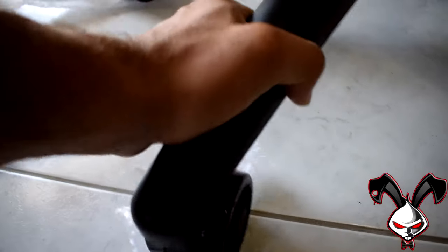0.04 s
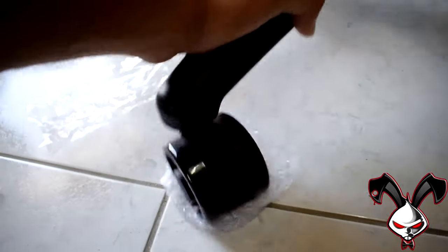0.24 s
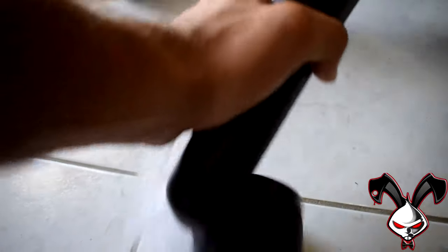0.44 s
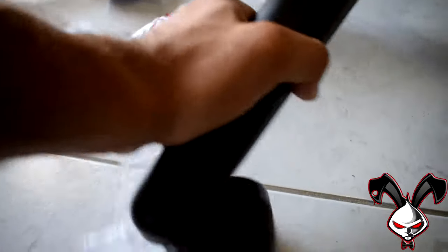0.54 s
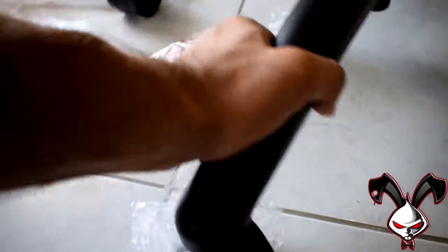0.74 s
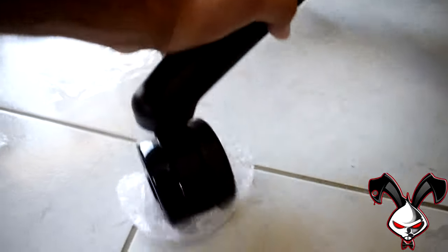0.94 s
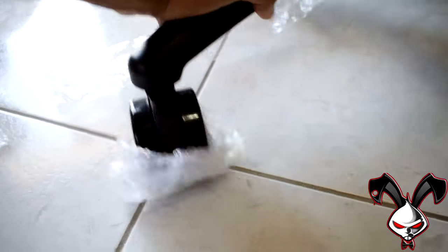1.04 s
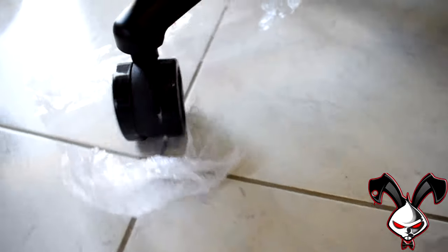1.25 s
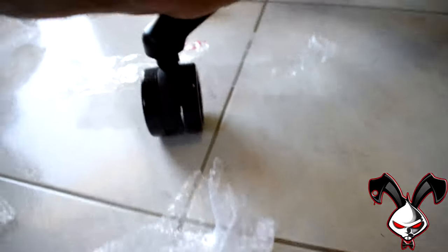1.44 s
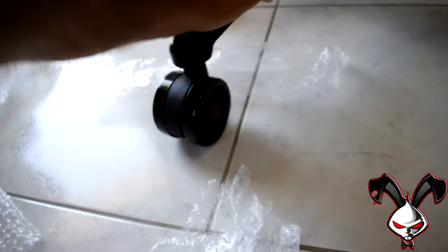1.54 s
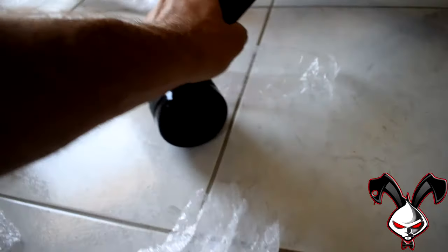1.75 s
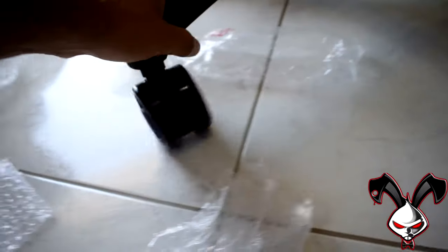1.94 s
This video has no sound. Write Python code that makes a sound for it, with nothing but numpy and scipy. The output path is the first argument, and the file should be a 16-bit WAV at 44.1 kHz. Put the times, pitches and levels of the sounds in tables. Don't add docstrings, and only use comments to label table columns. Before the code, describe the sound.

Bubble wrap popping under a hard plastic caster wheel, sharp crackling bursts with rattles on tile

```python
import sys
import numpy as np
from scipy import signal
from scipy.fft import rfft, irfft
from scipy.io import wavfile

SR = 44100
rng = np.random.default_rng(int(sys.argv[2]) if len(sys.argv) > 2 else 0)


def convert_level_to_amplitude(level_db):
    exponent = np.asarray(level_db, float) / 20
    return 10 ** exponent


def waveform_to_disk(signal):
    frames = np.transpose(np.atleast_2d(signal))
    scaled = np.clip(frames, -1, 1) * 32767
    samples = np.round(scaled).astype(np.int16)
    wavfile.write(sys.argv[1], SR, samples)


N = 88200
TRAVEL_S = 0.0012


def time(seconds):
    return np.arange(int(seconds * SR)) / SR


def fade(t, t60_s):
    return np.exp(-np.log(1000) * t / max(t60_s, 0.001))


def unit(x):
    return x / np.sqrt(np.mean(x ** 2))


def colour(x, points):
    point_hz, point_db = np.array(points, float).T
    hz = np.arange(x.shape[-1] // 2 + 1) * SR / x.shape[-1]
    gain = convert_level_to_amplitude(np.interp(np.log(hz + 1), np.log(point_hz), point_db))
    return irfft(rfft(x) * gain, x.shape[-1])


def conv(x, response):
    return signal.fftconvolve(x, response)[:N]


def lowpass(x, hz):
    return signal.lfilter(*signal.butter(2, hz, fs=SR), x)


def highpass(x, hz):
    return signal.lfilter(*signal.butter(2, hz, "high", fs=SR), x)


def steep(x, order, hz, kind):
    return signal.sosfilt(signal.butter(order, hz, kind, fs=SR, output="sos"), x)


def add(out, start_s, grain):
    i = int(start_s * SR)
    out[i:i + len(grain)] += grain[:len(out) - i]


def burst(noise, hz, t60_s, width):
    top_ratio = 1.433
    t = time(0.04)
    kick = noise * fade(t, t60_s) * 0.69 + 3.18 * (t == 0)
    y = signal.lfilter(*signal.iirpeak(hz, 1 / width, fs=SR), kick)
    y = signal.lfilter(*signal.butter(3, hz * top_ratio, fs=SR), y)
    return y / np.abs(y).max()


# start_s [s], level_db [peak dB], pitch_hz [Hz], snap_db [dB against the ring]
BUBBLE_POPS = [(.208, 2, 2400, -35), (0.246, -4.5, 2640, -24), (.256, 9, 3040, -11.5),
               (0.264, -7, 2600, -23), (0.287, 2, 3300, -15.5), (.293, 1, 1350, -29), (.432, 4, 2320, -12),
               (.439, -24, 2220, -30), (.453, -1, 2600, -26), (0.464, 3.5, 1920, -21),
               (0.484, -8, 2760, -36), (0.49, -1.5, 2320, -42), (0.547, 3.5, 2100, -21),
               (0.55, 4, 3600, -14), (0.556, 1, 2000, -29), (0.636, -1.5, 1560, -36),
               (0.648, -10, 1580, -31.5), (.670, -3.5, 2220, -24), (0.679, -1, 3420, -28),
               (.7625, 0, 2960, -29), (0.7897, 4.5, 2300, -33), (0.799, 2.5, 2570, -15.5),
               (0.843, 0.5, 3650, -26), (0.951, -12, 3320, -1.5), (0.96, -3, 1220, -40),
               (.973, 2.5, 2400, -36), (1.070, 3.5, 2700, -19), (1.109, -10, 3820, -1),
               (1.127, -4, 1737, -23.5), (1.424, -14, 2320, -35)]


def pops():
    ring_t60_s, ring_width, ring_db = 0.021, 1.23, -2.5
    snap_t60_s, snap_hz, snap_gain_db = 0.0053, 5400, 7.5
    out, t = np.zeros(N), time(0.04)
    for start_s, level_db, pitch_hz, snap_db in BUBBLE_POPS:
        air, tear = rng.standard_normal((2, len(t)))
        ring = burst(air, pitch_hz, ring_t60_s, ring_width)
        snap = highpass(tear * fade(t, snap_t60_s), snap_hz)
        pop = ring + convert_level_to_amplitude(snap_db + snap_gain_db) * snap
        add(out, start_s + TRAVEL_S, convert_level_to_amplitude(level_db + ring_db) * pop)
    return out


def swell(t):
    contact_s, t60_s = 0.00038, 0.051
    return fade(t, t60_s) * (1 - np.exp(-t / contact_s))


# pitch_hz [Hz], level_db [dB]
SHELL_MODES = [(1125, -23), (1211, -30.5), (1416, -28.5), (1836, -53.5), (2089, -28.5), (2412, -21),
               (2659, -52.5), (2815, -22.5), (2945, -24.5), (3273, -23.5), (3763, -21), (4355, -34.5),
               (5173, -45), (5803, -36)]
MODE_HZ, MODE_DB = np.array(SHELL_MODES, float).T


def shell(gains_db, t):
    level = convert_level_to_amplitude(MODE_DB - MODE_DB.max() + gains_db)
    modes = level[:, None] * np.sin(2 * np.pi * MODE_HZ[:, None] * t)
    return modes.sum(0) * swell(t)


# start_s [s], level_db [peak dB], pitch_hz [Hz], ring_share [0-1]
WHEEL_KNOCKS = [(.301, -6, 2880, 0.2), (.314, -14.5, 1420, 0), (.349, -6, 3670, 0.4),
                (.410, -13, 3730, 0.3), (.700, -12.5, 1450, 0.3), (.734, -13.5, 3620, 0.4),
                (0.804, 3.5, 2830, 0.38), (0.811, -0.5, 1240, 0.2), (0.816, -10.5, 4400, 0.6),
                (.830, -5, 1300, 1), (0.838, -2, 3250, 0.3), (.847, -2.5, 3720, 0.86),
                (1.037, -6.5, 2470, 0.43), (1.077, 0, 2730, 0.64), (1.086, -4.5, 3750, 0.88),
                (1.099, -5.5, 3840, 0.77), (1.383, -22, 1570, 0.67), (1.4212, -9.5, 2450, 0.06),
                (1.437, -27, 2100, 0), (1.523, -25, 2660, 0.6), (1.546, -19, 2230, 0.14),
                (1.573, -22.5, 2870, 0.37), (1.587, -23, 1470, 0.67), (1.715, -31.5, 2380, .9),
                (1.766, -33, 2970, 0.3), (1.773, -22.5, 1470, 1), (1.786, -16, 2600, 0.45),
                (1.797, -13, 2780, 0.49), (1.827, -37, 2380, 0.1), (1.914, -24, 1570, 0.8)]


def knocks():
    spread_oct, scatter_db, ring_db = 0.35, 1, -4
    clack_t60_s, clack_width, clack_db = 0.022, 0.22, -4
    out, t = np.zeros(N), time(0.25)
    for start_s, level_db, pitch_hz, ring_share in WHEEL_KNOCKS:
        nearness_db = -6 * (np.log2(MODE_HZ / pitch_hz) / spread_oct) ** 2
        ring = shell(nearness_db + scatter_db * rng.standard_normal(len(MODE_HZ)), t)
        ring = ring / np.abs(ring).max()
        clack = burst(rng.standard_normal(len(time(0.04))), pitch_hz, clack_t60_s, clack_width)
        add(out, start_s + TRAVEL_S, convert_level_to_amplitude(level_db + ring_db) * ring_share * 2 * ring)
        add(out, start_s + TRAVEL_S, convert_level_to_amplitude(level_db + clack_db) * (1 - ring_share) * 2 * clack)
    return out


def clicks(rate_per_s, scatter_db):
    largest = 2.5
    hit, size, sign = rng.random((3, N))
    level = convert_level_to_amplitude(scatter_db * np.minimum(-np.log(size + 1e-9), largest))
    return (hit < rate_per_s / SR) * level * np.sign(sign - 0.5)


def grains(rate_per_s):
    scatter_db, smear_s = 1, 0.0055
    envelope = conv(np.abs(clicks(rate_per_s, scatter_db)), fade(time(0.02), smear_s))
    return envelope * rng.standard_normal(N)


# pitch_hz [Hz], level_db [dB per Hz]
FILM_COLOUR = [(60, -68), (120, -21), (320, -19), (620, -5), (1800, -0.5), (3800, -9.5), (6500, -22.5),
               (15500, -59)]


def film(rustle):
    crackle = unit(colour(grains(1200), FILM_COLOUR))
    fine = unit(steep(highpass(grains(4000), 5000), 8, 12130, "low"))
    return convert_level_to_amplitude(-3) * crackle + rustle * fine


def rattle(strength):
    taps_per_s, size_scatter_db, tap_scatter_db = 250, 8.5, 5
    t = time(0.3)
    taps = unit(clicks(taps_per_s, size_scatter_db)) * strength
    ring = np.zeros(N)
    for hz, db in SHELL_MODES:
        uneven = taps * convert_level_to_amplitude(tap_scatter_db * rng.standard_normal(N))
        ring += convert_level_to_amplitude(db) * conv(uneven, np.sin(2 * np.pi * hz * t) * swell(t))
    return ring / np.linalg.norm(shell(0, t)) / convert_level_to_amplitude(MODE_DB.max())


# start_s [s], crackle_db [dB], rattle_db and rustle_db [dB against crackle]
ROLLING_EFFORT = [(0, -25.5, -12.5, -10.5), (.16, -41, -4.5, -7), (.24, -29.5, -4.5, -7),
                  (.3, -14, -8, -16.5), (0.419, -28.5, -18.5, -15.5), (0.479, -13.5, -15, -21.5),
                  (.62, -22.5, -21, -17.5), (0.749, -20, -7.5, -21.5), (0.808, -10, -7, -21),
                  (0.929, -27, -9, -19), (1.03, -21, -2, -16), (1.088, -17.5, -13, -20),
                  (1.248, -38, -5, -10), (1.45, -27.5, -18, -18.5), (1.68, -50, -9, -20),
                  (1.79, -28.5, -15.5, -20), (1.88, -36, -13, -31), (2, -36, -19, -14)]


def rolling():
    start_s, *curves_db = np.array(ROLLING_EFFORT, float).T
    effort, wheel, rustle = (convert_level_to_amplitude(np.interp(time(N / SR), start_s, db)) for db in curves_db)
    return effort * film(rustle) + rattle(effort * wheel)


# start_s [s], level_db [peak dB]
AIR_PUFFS = [
    (0.212, -36),
    (0.26, -22),
    (0.435, -33),
    (0.465, -31),
    (0.55, -32),
    (0.847, -38),
]


def puffs():
    puff_s, left_db = 0.0013, -6
    out, t = np.zeros(N), time(0.04)
    for start_s, level_db in AIR_PUFFS:
        add(out, start_s, convert_level_to_amplitude(level_db) * np.e * t / puff_s * np.exp(-t / puff_s))
    return out * convert_level_to_amplitude(np.array([[left_db], [-left_db]]) / 2)


# delay_s [s], level_db [dB]
NEAR_ECHOES = [
    (.0016, -15),
    (.0067, -14.5),
    (.012, -24),
]


def near_echoes(dry):
    out = dry.copy()
    for delay_s, level_db in NEAR_ECHOES:
        out += convert_level_to_amplitude(level_db) * np.pad(dry, (int(delay_s * SR), 0))[:N]
    return out


def room():
    t60_s, treble_t60_s, split_hz = 0.46, 0.18, 4500
    treble_db, gap_s, level_db = -4.5, 0.0031, -10
    t = time(0.54)
    noise = rng.standard_normal((2, 2, len(t)))
    low = lowpass(noise[0], split_hz) * fade(t, t60_s)
    high = highpass(noise[1], split_hz) * fade(t, treble_t60_s)
    tail = (low + convert_level_to_amplitude(treble_db) * high) * (1 - np.exp(-t / gap_s))
    return convert_level_to_amplitude(level_db) * tail / np.sqrt((tail ** 2).sum(1, keepdims=True))


def scattered(near):
    spread_s, wander_hz = 0.016, 150
    t = time(0.02)
    spread = rfft(rng.standard_normal(len(t)) * t * fade(t, spread_s))
    smear = irfft(spread / np.abs(spread), len(t))
    return conv(near, smear) * unit(lowpass(rng.standard_normal(N), wander_hz))


# pitch_hz [Hz], level_db [dB per Hz]
HUSH_COLOUR = [(30, -45), (90, -25), (200, -10), (600, -3.5), (1400, -4), (4700, -14.5), (11500, -18),
               (15700, -33)]


def hush():
    return convert_level_to_amplitude(-43) * unit(colour(rng.standard_normal((2, N)), HUSH_COLOUR))


def microphone(strikes, roll):
    presence_hz, presence_width_hz, presence_db = 5830, 1860, -2
    dry = steep(strikes, 3, [576, 13000], "band") + roll
    dry = steep(dry, 3, 115, "high")
    peak = signal.iirpeak(presence_hz, presence_hz / presence_width_hz, fs=SR)
    return dry + convert_level_to_amplitude(presence_db) * signal.lfilter(*peak, dry)


# pitch_hz [Hz], side_db [dB against mid]
STEREO_WIDTH = [(60, -20), (300, -29), (800, -32.5), (1600, -31), (3200, -13), (5500, -15.5), (9000, -2.5),
                (15000, -7)]


def scene():
    dry = microphone(pops() + knocks(), rolling())
    near = near_echoes(dry)
    tails, tone = room(), hush()
    mid = near + conv(dry, tails[0]) + tone[0]
    side = colour(scattered(near) + conv(dry, tails[1]) + tone[1], STEREO_WIDTH)
    return np.array([mid + side, mid - side]) + puffs()


def top_cut(x):
    return signal.sosfilt(signal.butter(12, 15850, fs=SR, output="sos"), x)


def record(dry):
    top_hz, knee = 15700, 8
    cut = signal.sosfilt(signal.ellip(6, 0.3, 50, top_hz, fs=SR, output="sos"), dry)
    mix = cut / (1 + np.abs(cut) ** knee) ** (1 / knee)
    return top_cut(mix)


dry = scene()
out = record(dry)
waveform_to_disk(out)
```